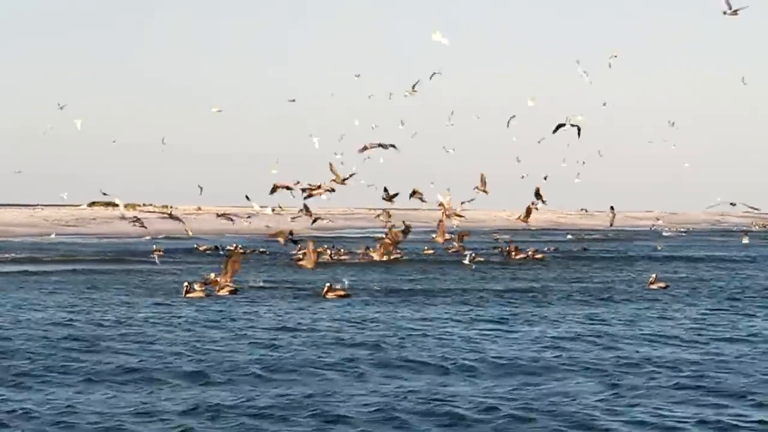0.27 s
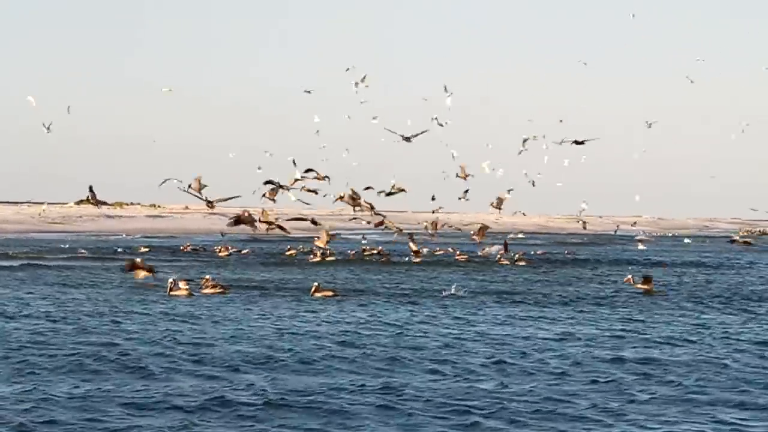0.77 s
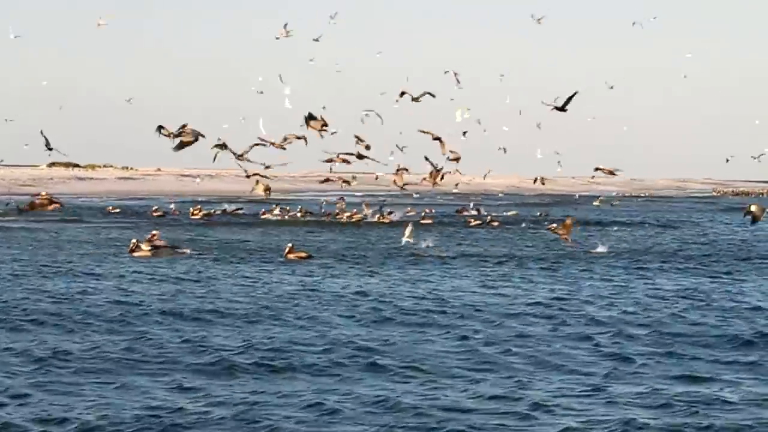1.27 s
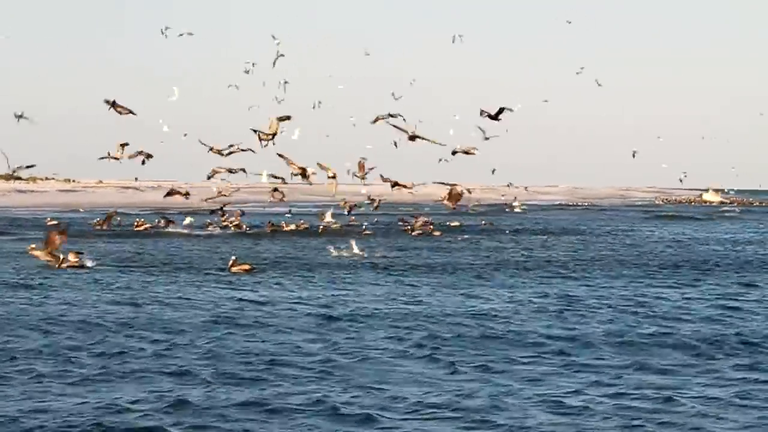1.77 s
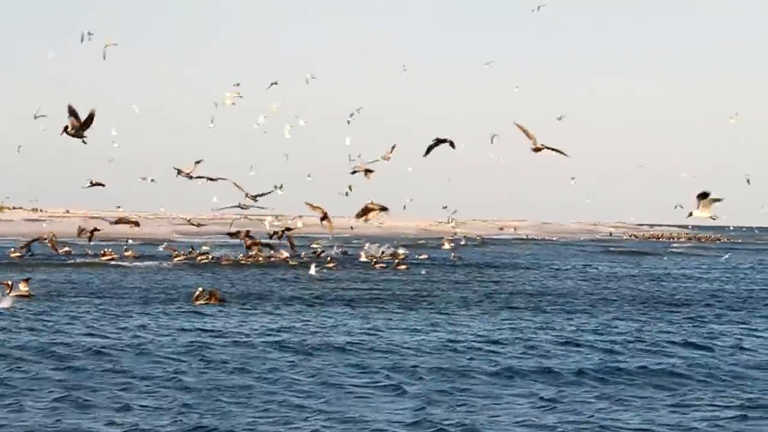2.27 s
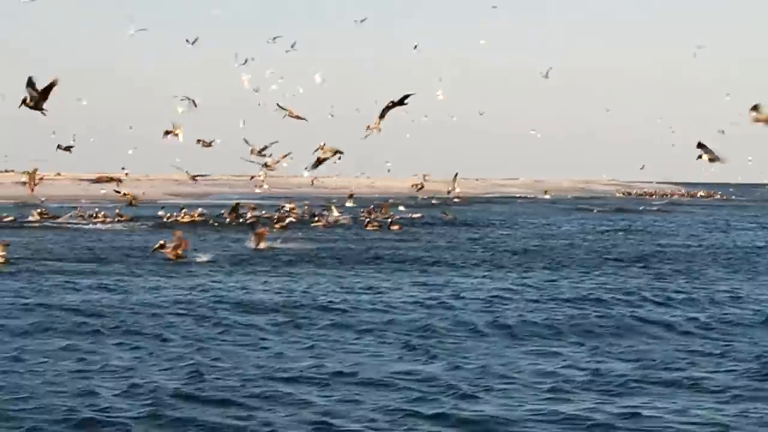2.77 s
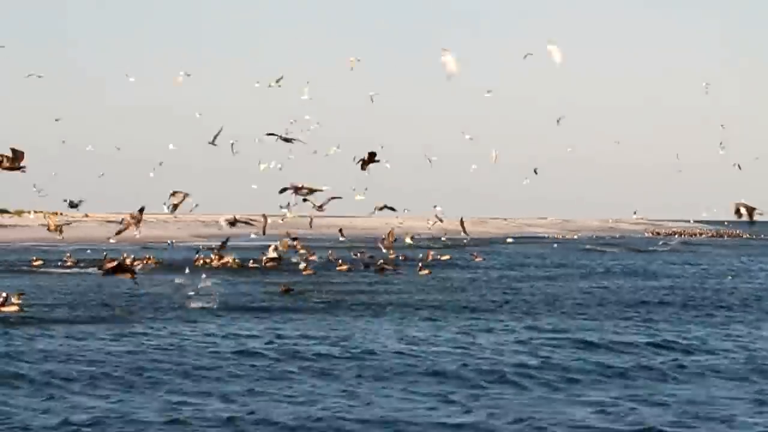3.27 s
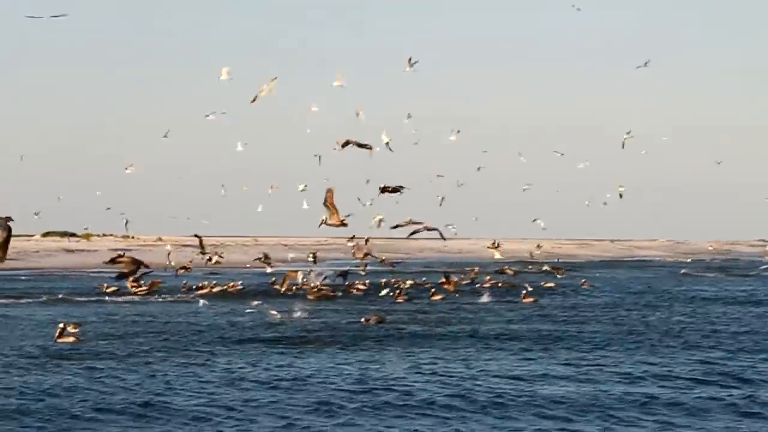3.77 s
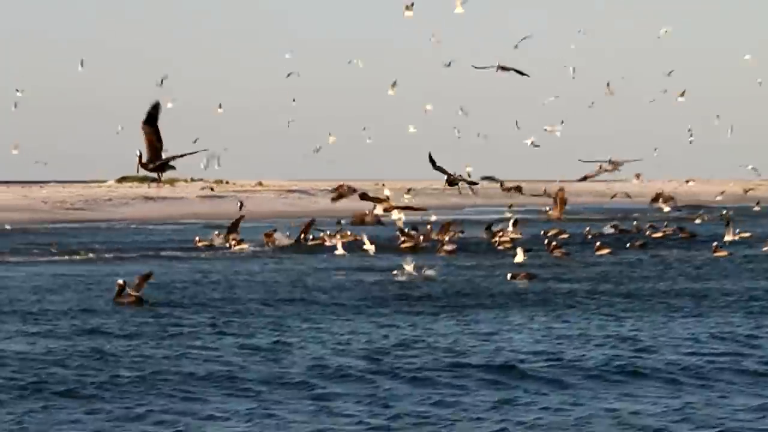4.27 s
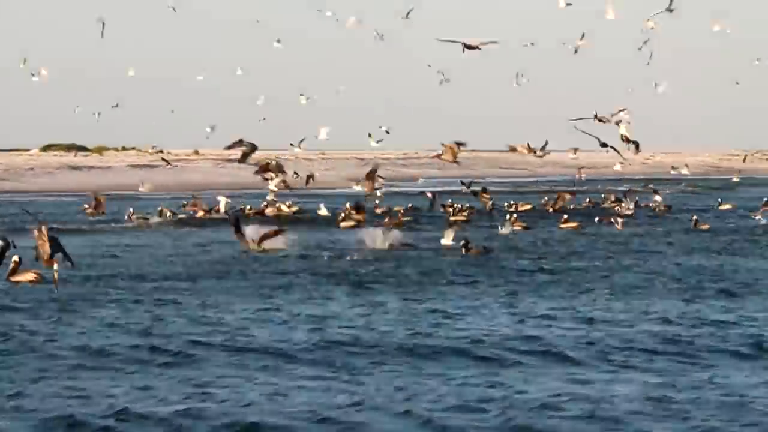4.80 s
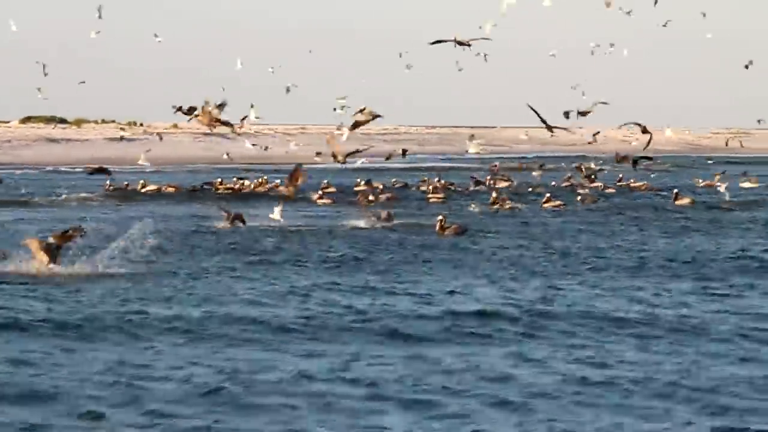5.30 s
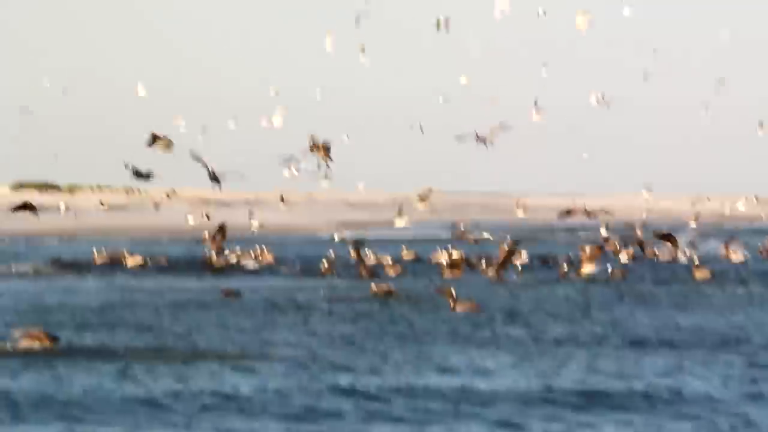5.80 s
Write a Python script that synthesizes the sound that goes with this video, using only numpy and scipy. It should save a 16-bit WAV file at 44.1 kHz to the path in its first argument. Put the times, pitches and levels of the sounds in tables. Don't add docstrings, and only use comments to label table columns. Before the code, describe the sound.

From the start, low wind bursts pummel a handheld camera's unprotected microphone, with membrane flaps and brief cracks at the strongest gusts. Shrill tern calls run on continuously, the distant crowd blurring together while nearer birds yelp and squeak individually. The wind eases around three and a half to four and a half seconds, exposing the birds, then returns. Faint steady sea hiss and a barely audible thin electronic whine lie underneath.

```python
import sys
import numpy as np
from scipy import signal
from scipy.fft import rfft, irfft
from scipy.io import wavfile
from scipy.ndimage import uniform_filter1d

SR = 44100
rng = np.random.default_rng(int(sys.argv[2]) if len(sys.argv) > 2 else 0)


def volts_from_db(level):
    exponent = np.asarray(level, float) / 20
    return 10 ** exponent


def pcm_store(signal):
    levels = np.round(np.clip(np.atleast_2d(signal), -1, 1) * 32767)
    wavfile.write(sys.argv[1], SR, levels.astype(np.int16).T)


N = 266672

# (frequency [Hz], level [dB])
SEA_SPECTRUM = [(200, 6.5), (450, 4.5), (1000, -1.5), (1600, -4), (2400, 5.5), (4000, -8.5), (8000, -59)]
SEA_DB = -48.5

# (time [s], level [dB])
BREEZE = [(0.0, -35), (0.6, -34), (1.21, -44), (1.81, -36), (2.42, -42.5), (3.02, -47), (3.63, -50),
          (4.23, -46), (4.84, -41.5), (5.44, -43), (6.05, -37)]
# (frequency [Hz], level [dB])
EDDY_SPECTRUM = [(8, -72), (40, -70), (100, -2.5), (220, -1.5), (450, -11.5), (900, -26.5), (2000, -51.5),
                 (5000, -78)]
# (time [s], level [dB], width [s])
SWELLS = [(0.05, -27, 0.057), (0.426, -31, 0.038), (.589, -27, 0.04), (0.703, -27.5, .11),
          (0.868, -23.5, 0.076), (1.105, -22, 0.053), (1.292, -42, 0.19), (1.409, -21.5, 0.066),
          (1.701, -24.5, .17), (1.935, -23.5, 0.043), (2.291, -24, 0.16), (2.609, -27, 0.052),
          (2.752, -36.5, 0.14), (3.014, -46.5, 0.23), (3.277, -24.5, 0.069), (3.66, -46.5, 0.12),
          (4.0, -41.5, 0.3), (4.529, -40, 0.044), (4.655, -25.5, .083), (4.854, -35, 0.11),
          (5.069, -23, 0.16), (5.235, -37.5, 0.17), (5.522, -41, 0.09), (5.612, -30.5, 0.042),
          (5.879, -23.5, 0.054), (5.973, -37.5, 0.035)]
SWELL_HZ, SWELL_HZ_PER_DB = 190, 2.5
# (time [s], level [dB], width [s], eddy pitch [Hz])
PUFFS = [(0.017, -17.5, .018, 250.7), (0.191, -28, 0.017, 207.1), (0.243, -23.5, 0.025, 193.2),
         (.308, -19, 0.027, 261.5), (.346, -25, 0.033, 198.3), (.48, -17.5, 0.033, 284.3),
         (0.535, -27.5, 0.02, 259.4), (.789, -25, 0.019, 268.4), (.991, -35, 0.018, 216.3),
         (1.067, -31, 0.039, 171.7), (1.092, -16.5, 0.02, 269.7), (1.558, -21, 0.017, 169.1),
         (1.587, -23, 0.024, 220.7), (1.636, -20.5, 0.027, 262.8), (1.992, -21, 0.033, 197.6),
         (2.215, -20.5, 0.032, 284), (2.284, -19.5, .016, 314.5), (2.433, -29, 0.024, 268.9),
         (2.72, -21.5, 0.018, 213.1), (3.192, -36.5, 0.022, 182.5), (3.297, -16.5, .023, 416.3),
         (3.648, -24, 0.018, 226.4), (4.258, -27, 0.033, 276.9), (4.901, -26.5, 0.018, 265.2),
         (5.02, -18, 0.022, 335.1), (5.263, -18.5, 0.014, 328.4), (5.314, -22, 0.02, 238.7),
         (5.395, -26, 0.015, 268.2), (5.739, -28, 0.027, 144.2), (5.896, -16, 0.014, 238.3)]
# (time [s], level [dB], eddy pitch [Hz])
JOLTS = [(0.036, -17, 295.8), (.061, -17.5, 403.2), (0.701, -21, 302), (0.833, -20, 259.3),
         (1.679, -20, 226.5), (1.731, -19.5, 223), (1.738, -19, 190), (1.805, -25.5, 235.1),
         (1.826, -15.5, 204.9), (1.839, -25.5, 194), (1.853, -16, 315.4), (1.868, -27, 199.8),
         (1.942, -13.5, 231.4), (2.351, -16, 245), (2.508, -33.5, 250.2), (2.539, -15, 333.7),
         (2.555, -25, 229.8), (2.635, -18.5, 330.2), (2.784, -11.5, 235.8), (2.981, -30.5, 178.4),
         (3.932, -29.5, 149.8), (4.63, -16, 170.1), (5.041, -14.5, 292.2), (5.124, -18.5, 322.2),
         (5.214, -22.5, 287)]
JOLT_S = 0.0105
# (time [s], peak level [dB])
MEMBRANE_FLAPS = [(0.059, -13), (0.465, -5), (0.696, -14), (0.829, -12), (1.094, -5), (1.385, -31),
                  (1.446, -22), (1.548, -14.5), (1.674, -8), (1.803, -11.5), (1.851, -5.5), (1.94, -9.5),
                  (2.212, -10), (2.335, -7.5), (2.534, -30), (2.636, -24), (2.71, -6), (2.782, -8.5),
                  (3.258, -11.5), (3.306, -3.5), (3.643, -12.5), (4.631, -3.5), (5.018, -19), (0.492, -12),
                  (5.212, -14.5), (5.261, -28), (5.319, -7.5), (5.858, -9), (5.895, -33),
                  (0.129, -18), (0.233, -26), (0.302, -12.5), (0.478, -7), (0.591, -16), (0.656, -17),
               (0.79, -16), (0.859, -15), (0.897, -10.5), (1.114, -7), (1.388, -18), (1.589, -13),
               (1.622, -24), (1.728, -30), (1.762, -21), (1.916, -20), (1.979, -38), (2.22, -8.5),
               (2.246, -14), (3.284, -16), (3.654, -33), (4.241, -19), (4.991, -16), (5.125, -22),
               (5.193, -20), (5.304, -35), (5.392, -21), (5.884, -34)]
# (frequency [Hz], level [dB])
FLAP_SPECTRUM = [(150, -18), (600, 7.5), (1500, -15.5), (3000, -22.5), (6000, -87)]
# (time [s], peak level [dB])
CRACKS = [(.062, -9.5), (.474, -20), (0.489, -20), (.697, -16), (1.096, -25), (1.673, -30), (2.215, -36),
          (2.536, -25), (2.637, -15), (2.712, -10), (2.785, -15.5), (3.307, -6), (3.645, -30), (5.263, -23),
          (5.32, -16)]
# (frequency [Hz], level [dB])
CRACK_SPECTRUM = [(400, -23), (1200, 2), (2800, 2.5), (5000, -27), (8000, -40)]

# (frequency [Hz], level [dB])
THROAT = [(590, -2), (1000, 1), (1860, 4.5), (2970, 1.5), (4490, 0.5), (5780, -4.5), (7530, -20.5),
          (8740, -24.5), (11000, -25.5), (12000, -28.5), (15500, -42)]
ODD_DB = 2.5
# (start [s], length [s], level [dB], treble share [dB])
OUTBURSTS = [(-.05, 0.28, -36, -15), (0.252, 0.25, -38.5, -21), (0.39, 0.24, -39.5, -15),
             (0.649, 0.086, -41, -14.5), (0.693, 0.16, -36.5, -15.5), (0.854, 0.3, -36.5, -17),
             (1.103, 0.42, -42, -18.5), (1.503, 0.33, -38, -17), (1.787, 0.37, -40, -15.5),
             (2.022, 0.19, -42.5, -14.5), (2.243, 0.26, -38, -14), (2.574, 0.32, -47.5, -14.5),
             (2.89, 0.16, -48.5, -12), (2.987, 0.18, -41, -11.5), (3.189, 0.47, -44, -15),
             (3.657, 0.18, -66, 2), (3.8, 0.26, -51, -13), (4.087, 0.42, -40, -13.5),
             (4.513, 0.19, -38, -14), (4.681, 0.22, -35.5, -17), (4.854, 0.21, -36, -13.5),
             (5.066, 0.16, -68, -30), (5.27, 0.35, -40, -19), (5.56, 0.1, -42.5, -28),
             (5.713, 0.2, -40.5, -14), (5.895, 0.28, -38, -16.5)]
OUTBURST_EDGE = 0.52
LULL_DB, LULL_TREBLE_DB = -49, -18

# (time [s], length [s], top pitch [Hz], level [dB], slant [share of pitch])
CLEAR_CRIES = [(0.006, 0.042, 2839, -40, -0.015), (0.027, 0.096, 2925, -33.5, 0.025),
               (0.069, 0.027, 3480, -38, -0.0085), (0.101, 0.05, 3100, -34, -0.043),
               (0.15, 0.073, 1563, -40, -0.045), (0.161, 0.047, 3300, -41.1, -0.031),
               (0.217, 0.058, 2931, -46.8, 0.025), (0.294, 0.077, 1560, -42, -0.033),
               (0.43, 0.06, 3410, -37.5, -0.03), (0.503, 0.03, 3530, -37.5, 0.0093),
               (0.526, 0.026, 3173, -42, -0.054), (0.644, 0.037, 1530, -42.5, 0.025),
               (0.712, 0.049, 2884, -48, -0.018), (0.812, 0.035, 2871, -41, -0.02),
               (0.833, 0.052, 2910, -35, 0.035), (0.879, 0.022, 2626, -36, 0.12),
               (0.911, 0.034, 1564, -35, -0.019), (0.946, 0.033, 2930, -35.5, -0.049),
               (0.984, 0.041, 3030, -34, 0.03), (1.014, 0.052, 3370, -40, -0.051),
               (1.074, 0.046, 3151, -57, 0.013), (1.154, 0.064, 3476, -45, -0.018),
               (1.221, 0.035, 1573, -56, -0.036), (1.227, 0.04, 3560, -43, 0.015),
               (1.27, 0.03, 1600, -38, -0.0061), (1.294, 0.033, 3115, -43, -0.027),
               (1.336, 0.047, 1580, -39, -0.0338), (1.349, 0.045, 1730, -45, -0.0049),
               (1.388, 0.038, 1550, -46, -0.018), (1.412, 0.045, 3366, -39.5, 0.0016),
               (1.473, 0.047, 1511, -44, -0.12), (1.573, 0.034, 2950, -35, -0.03),
               (1.59, 0.032, 1530, -36, -0.04), (1.642, 0.032, 2960, -37, 0.048),
               (1.668, 0.049, 2894, -37, -0.02), (1.706, 0.032, 1432, -42, -0.086),
               (1.72, 0.049, 1580, -53, 0.011), (1.848, 0.11, 2904, -42.5, 0.048),
               (1.974, 0.041, 2810, -51, -0.081), (1.992, 0.023, 1770, -48, -0.078),
               (2.052, 0.074, 1735, -39, -0.014), (2.082, 0.045, 3074, -40, -0.023),
                (2.132, 0.056, 1630, -42.5, -0.043), (2.19, 0.035, 1501, -45, -0.014),
                (2.274, 0.031, 1677, -38.5, -0.032), (2.339, 0.032, 1651, -46, -0.077),
                (2.369, 0.032, 1525, -44, -0.038), (2.523, 0.032, 2707, -60, -0.042),
                (2.575, 0.042, 1513, -46, -0.027), (2.629, 0.037, 3224, -46, 0.0045),
                (2.656, 0.043, 3408, -49, 0.039), (2.709, 0.04, 3463, -40, -0.053),
                (2.736, 0.092, 1638, -42, -0.022), (2.794, 0.034, 1773, -46, -0.058),
                (2.829, 0.03, 1386, -54, 0.0025), (2.848, 0.049, 3355, -54, -0.026),
                (2.908, 0.036, 3302, -43.5, 0.035), (2.948, 0.056, 2816, -49, -0.021),
                (2.998, 0.034, 1477, -38.5, -0.016), (3.069, 0.035, 3276, -49, 0.0089),
                (3.078, 0.03, 2931, -34, -0.019), (3.102, 0.035, 2816, -38, -0.0017),
                (3.184, 0.034, 1501, -46.5, 0.012), (3.24, 0.048, 1537, -42, 0.0038),
                (3.319, 0.044, 3408, -41, -0.074), (3.468, 0.047, 2884, -38, -0.059),
                (3.562, 0.033, 2884, -41.5, -0.0051), (3.595, 0.033, 1788, -42, -0.0036),
                (3.611, 0.044, 2728, -44.5, -0.048), (3.657, 0.041, 2884, -43, 0.025),
                (3.691, 0.028, 2707, -54, -0.047), (3.713, 0.052, 2816, -44.5, -0.06),
                (3.766, 0.045, 2622, -43, -0.01), (3.801, 0.047, 2884, -37.5, -0.029),
                (3.837, 0.047, 1408, -41, -0.057), (3.87, 0.054, 2772, -44, -0.011),
                (3.929, 0.03, 2750, -45, -0.012), (3.942, 0.043, 3049, -44, 0.04),
                (3.999, 0.049, 3198, -68, -0.035), (4.018, 0.1, 2978, -60, 0.037),
               (4.118, 0.025, 3294, -41.5, -0.042), (4.182, 0.028, 3405, -43, -0.011),
              (4.215, 0.051, 3260, -48, 0.047), (4.236, 0.034, 2701, -41, -0.027),
              (4.254, 0.035, 1789, -43, 0.052), (4.272, 0.044, 2805, -50, -0.027),
              (4.334, 0.044, 1595, -41.7, -0.099), (4.335, 0.039, 3632.0, -41, -0.029),
              (4.402, 0.038, 3660, -40, -0.007), (4.414, 0.054, 1545, -48, -0.049),
              (4.428, 0.031, 1653, -41.5, -0.064), (4.476, 0.042, 1662, -49, -0.044),
              (4.533, 0.034, 2915, -40.5, 0.019), (4.587, 0.045, 3120, -37, 0.025),
              (4.603, 0.033, 2772, -38, 0.016), (4.638, 0.041, 1376, -48, -0.044),
              (4.68, 0.04, 2799, -36, 0.03), (4.799, 0.03, 1406, -32.5, -0.0325),
              (4.804, 0.036, 2702, -27, -0.0274), (4.867, 0.065, 2935, -47, -0.011),
              (4.997, 0.042, 2810, -36.5, -0.02), (4.998, 0.033, 3353, -46, 0.017),
              (5.063, 0.028, 1344, -47, -0.0072), (5.096, 0.029, 3090, -50, 0.057),
              (5.156, 0.042, 2960, -48.5, 0.068), (5.19, 0.041, 1620, -45.5, -0.0045),
              (5.253, 0.047, 1473, -44, -0.0095), (5.301, 0.11, 2720, -44.5, -0.033),
              (5.373, 0.039, 2780, -40, -0.028), (5.374, 0.037, 1591, -41.9, 0.0011),
              (5.41, 0.052, 3245, -54, 0.038), (5.425, 0.046, 2650, -52, 0.064),
              (5.573, 0.041, 2710, -44.3, 0.061), (5.605, 0.062, 1652, -51, -0.1),
              (5.715, 0.032, 1503, -45.5, -0.0085), (5.767, 0.04, 3136, -41.5, -0.017),
              (5.823, 0.03, 1426, -40, 0.027), (5.851, 0.049, 2943, -46, 0.024),
              (5.904, 0.032, 1551, -41, -0.006), (5.965, 0.041, 1363, -32, 0.058)]
CRY_ARCH, CRY_TILT_DB, CRY_GAIN_DB = 0.0808, 3.5, -2.5
CRY_ONSET_S = 0.005
# (time [s], added tilt [dB per octave])
CLOSE_CALLERS = [(.12, -1), (.33, 7), (.46, 8), (.515, 13), (.665, 0), (1.315, 8.5), (1.36, 1), (2.73, -5),
                 (3.68, -4), (3.825, 3.5), (4.27, 7), (4.353, 5), (4.42, 7.5), (4.823, 1), (5.21, 2),
                 (5.733, 2), (5.79, 5.5)]
CLEAR_ROUGH, USUAL_ROUGH = 0.07, 0.17
# (time [s], length [s], pitch [Hz], level [dB])
MEWS = [
    (1.96, 0.14, 1973, -45),
    (2.79, 0.16, 2116, -60),
    (3.9, 0.1536, 2133, -74),
    (4.24, 0.11, 2031, -54),
]
MEW_RISE, MEW_FALL = 0.13, 0.17
# (time [s], length [s], pitch [Hz], throb rate [per s], level [dB])
RATTLES = [
    (2.27, .2, 1480, 140, -44),
    (5.944, .024, 1340, 165, -38),
]
# (time [s], length [s], pitch
# [Hz], level [dB])
BEATS = [(4.716, 0.0049, 1330, -32.5), (4.725, 0.0055, 1417, -33), (4.734, 0.0036, 1398, -40),
         (4.738, 0.012, 1430, -29.5), (4.7586, 0.0062, 1420, -30.5), (4.771, 0.012, 2350, -32.5),
         (4.788, 0.0062, 2300, -35), (4.7884, 0.0033, 1337, -31), (4.793, 0.0083, 2283, -33),
         (4.832, 0.018, 2390, -36), (4.848, 0.0036, 1260, -37)]
# (time [s], length [s], start [Hz], middle [Hz], end [Hz], level [dB])
HOOT = (5.997, .06, 2330, 2170, 2480, -33)
RATTLE_TILT_DB, BEAT_TILT_DB, HOOT_TILT_DB = 4, 5.5, -8

# (frequency [Hz], share [%])
THINNING = [(6000, 0), (8000, 4), (12500, 8), (14000, 33)]
# (time [s], level [dB])
WHINE_PEAKS = [(.2, -63), (.75, -66), (1.0, -70), (1.46, -69), (2.25, -71), (3.12, -74), (3.5, -77),
               (4.15, -77), (4.4, -76), (4.949, -73), (5.4, -68), (5.8, -65)]
WHINE_HZ, EDGE_HZ = 15715, 15830
WHINE_RISE_DB_PER_S, WHINE_FALL_DB_PER_S = 37, 34


def evened(x):
    return x / np.sqrt(np.mean(x ** 2) + 1e-20)


def read(points, hz):
    f, value = np.transpose(points)
    return np.interp(np.log(hz + 1), np.log(f + 1), value)


def coloured(x, points):
    gain = volts_from_db(read(points, np.fft.rfftfreq(len(x), 1 / SR)))
    return irfft(rfft(x) * gain, len(x))


def levelled(x, size, share):
    power = abs(uniform_filter1d(uniform_filter1d(x ** 2, size), size))
    return evened(x / (power + 1e-9) ** (share / 2))


def add(mix, s, sound):
    part = mix[round(s * SR):][:len(sound)]
    part += sound[:len(part)]


def sea():
    return volts_from_db(SEA_DB) * evened(coloured(rng.standard_normal(N), SEA_SPECTRUM))


def airflow():
    t = np.arange(N) / SR
    power = volts_from_db(np.interp(t, *np.transpose(BREEZE))) ** 2
    moment = power * 150
    swells = [(s, db, width, SWELL_HZ + SWELL_HZ_PER_DB * (db + 40)) for s, db, width in SWELLS]
    jolts = [(s, db, JOLT_S, hz) for s, db, hz in JOLTS]
    for s, db, width, hz in swells + PUFFS + jolts:
        near = slice(max(round((s - 2 * width) * SR), 0), round((s + 2 * width) * SR))
        burst = volts_from_db(db) ** 2 * np.exp(-abs(2 * (t[near] - s) / width) ** 3)
        power[near] += burst
        moment[near] += burst * hz
    return power, moment / power


def flaps(out):
    for s, db in MEMBRANE_FLAPS:
        flap = evened(coloured(rng.standard_normal(1024), FLAP_SPECTRUM))
        flap = flap * np.exp(-np.arange(1024) / SR / 0.0027)
        add(out, s, volts_from_db(db - 13.0) * flap / np.std(flap[:150]) * signal.windows.tukey(1024, 0.05))
    for s, db in CRACKS:
        crack = evened(coloured(rng.standard_normal(512), CRACK_SPECTRUM))
        crack = crack * np.exp(-np.arange(512) / SR / 0.0023)
        add(out, s, volts_from_db(db - 11.0) * crack)


def wind():
    power, eddy_hz = airflow()
    lumps = rng.standard_normal(N)
    lumps = evened(uniform_filter1d(uniform_filter1d(lumps, size=250), size=250))
    speed = (eddy_hz / 230) ** 1.4 * volts_from_db(1.2 * lumps)
    eddies = coloured(rng.standard_normal(3 * N), EDDY_SPECTRUM)
    swept = np.interp(np.cumsum(speed), np.arange(3 * N), eddies)
    out = np.sqrt(power) * levelled(swept * volts_from_db(5.0 * lumps), size=260, share=0.8)
    heave_spectrum = [(15, -12), (45, -2.5), (90, 3.0), (180, -7.0), (400, -31.5)]
    heave = evened(coloured(rng.standard_normal(N), heave_spectrum))
    out += volts_from_db(-7.5) * np.sqrt(abs(uniform_filter1d(power, size=900))) * heave
    flaps(out)
    return coloured(out, [(3500, 0), (7500, -40)])


def outbursts():
    t = np.arange(N) / SR
    body = np.full(N, volts_from_db(LULL_DB) ** 2)
    treble = np.full(N, volts_from_db(LULL_DB + LULL_TREBLE_DB) ** 2)
    for s, length, db, treble_db in OUTBURSTS:
        inside = np.minimum(t - s, s + length - t) / (OUTBURST_EDGE * length / 2)
        power = (volts_from_db(db) * np.clip(inside, 0, 1)) ** 2
        body = body + power
        treble = treble + power * volts_from_db(treble_db) ** 2
    return np.sqrt(body), np.sqrt(treble)


def crowd(count=480):
    mix = np.zeros(N)
    for s, length, pitch, kind, rise, fall, size, rough in rng.random((count, 8)):
        hz = (1350 + 430 * pitch ** 2) * (2 if kind < 0.4 else 1)
        start, end = hz * (0.97 - 0.12 * rise), hz * (0.97 - 0.16 * fall)
        throb = (90 + 130 * rise) * (rough > 0.96)
        voice = cry(0.02 + 0.04 * length ** 2, start, hz, end, 6 * size,
                    rough=0.1 + 0.5 * rough ** 3, tilt_db=2.5, throb=throb)
        add(mix, s * N / SR, voice)
    mix = mix + 0.85 * np.interp((np.arange(N) * 0.97 + N / 2) % N, np.arange(N), mix)
    far = evened(coloured(rng.standard_normal(N), THROAT))
    mix = evened(mix) + 0.25 * far
    loud, near = outbursts()
    body = coloured(mix, [(6500, 0), (7500, -60)])
    treble = mix - body
    return loud * levelled(body, size=1200, share=1.0) + near * levelled(treble, size=1200, share=0.38)


def cry(length, start, middle, end, db, rough, tilt_db, throb=0):
    u = np.linspace(-1, 1, round(length * SR))
    slant = (end - start) / 2 * (u + u ** 3) / 2
    sag = ((start + end) / 2 - middle) * (u ** 2 + u ** 4) / 2
    arch = middle + slant + sag
    pace, phase = rng.random((2, 2))
    cycles = (25 + 45 * pace[:, None]) * length * u / 2 + phase[:, None]
    waver, breaks = np.sin(2 * np.pi * cycles)
    arch = arch * (1 + 0.006 * waver)
    shake, flutter = uniform_filter1d(rng.standard_normal((2, len(u))), size=60) * np.sqrt(60)
    turns = np.cumsum(arch * (1 + 0.05 * rough * shake)) / SR
    k = np.arange(1, 15000 // max(start, middle, end) + 1)[:, None]
    strength = read(THROAT, k * arch) + tilt_db * np.log2(k * middle / 4000)
    strength = strength + 2.5 * rng.standard_normal(k.shape)
    strength -= 10 * (k * middle < 1850)
    strength += ODD_DB * (k % 2) * (middle < 1850)
    harmonics = volts_from_db(strength) * np.sin(2 * np.pi * (k * turns + rng.random(k.shape)))
    voice = evened(harmonics.sum(0))
    voice = voice * (1 + 1.6 * rough * flutter) * (1 + 0.3 * breaks)
    if throb:
        voice = voice * (0.15 + 2.2 * np.sin(np.pi * throb * length * u / 2) ** 6)
    return volts_from_db(db) * voice * signal.windows.tukey(len(u), 0.4)


def terns():
    out = np.zeros(N)
    for s, length, hz, db, slant in CLEAR_CRIES:
        start, end = hz * (1 - CRY_ARCH - slant), hz * (1 - CRY_ARCH + slant)
        close_db = max([tilt_db for at, tilt_db in CLOSE_CALLERS if s < at < s + length], default=0)
        rough = CLEAR_ROUGH if close_db else USUAL_ROUGH
        voice = cry(length + CRY_ONSET_S, start, hz, end, db + CRY_GAIN_DB, rough,
                    tilt_db=CRY_TILT_DB + close_db)
        add(out, max(s - CRY_ONSET_S, 0), voice)
    for s, length, hz, db in MEWS:
        start, end = hz * (1 - MEW_RISE), hz * (1 - MEW_FALL)
        add(out, s, cry(length, start, hz, end, db, rough=0.027, tilt_db=-29))
    for s, length, hz, throb, db in RATTLES:
        add(out, s, cry(length, hz, 1.03 * hz, 0.94 * hz, db, rough=0.3, throb=throb,
                        tilt_db=RATTLE_TILT_DB))
    for s, length, hz, db in BEATS:
        tilt_db = BEAT_TILT_DB if hz < 1850 else HOOT_TILT_DB
        add(out, s, cry(length, hz, hz, hz, db, rough=0.35, tilt_db=tilt_db))
    add(out, HOOT[0], cry(*HOOT[1:], rough=0.25, tilt_db=HOOT_TILT_DB))
    return out


def scene():
    air = wind()
    return (sea() + crowd() + terns() + air)[None]


def thinned(x):
    hz, _, z = signal.stft(x, SR, nperseg=512)
    centre = np.minimum(np.arange(len(hz)) // 6 * 6 + 3, len(hz) - 1)
    power = uniform_filter1d(abs(z) ** 2, size=6, axis=0)
    power = uniform_filter1d(power, size=2, axis=1)[centre]
    power = power / np.sqrt(uniform_filter1d(power.sum(0), size=20))
    limit = np.array([np.percentile(row, share) for row, share in zip(power, read(THINNING, hz))])
    gain = np.where(power < limit[:, None], 0.1, 1)
    return signal.istft(z * gain, SR, nperseg=512)[1][:N]


def whine():
    t = np.arange(N) / SR
    slopes = [db - np.maximum(WHINE_RISE_DB_PER_S * (s - t), WHINE_FALL_DB_PER_S * (t - s))
              for s, db in WHINE_PEAKS]
    return volts_from_db(np.max(slopes, axis=0) + 10.0) * np.sin(2 * np.pi * WHINE_HZ * t)


def band_limit(x):
    return signal.sosfilt(signal.butter(12, 16220, fs=SR, output="sos"), x)


def record(dry):
    heard = thinned(dry[0]) + whine()
    mix = coloured(heard, [(EDGE_HZ - 60, 0), (EDGE_HZ, -70)])[None]
    return band_limit(mix)


dry = scene()
out = record(dry)
pcm_store(out)
```